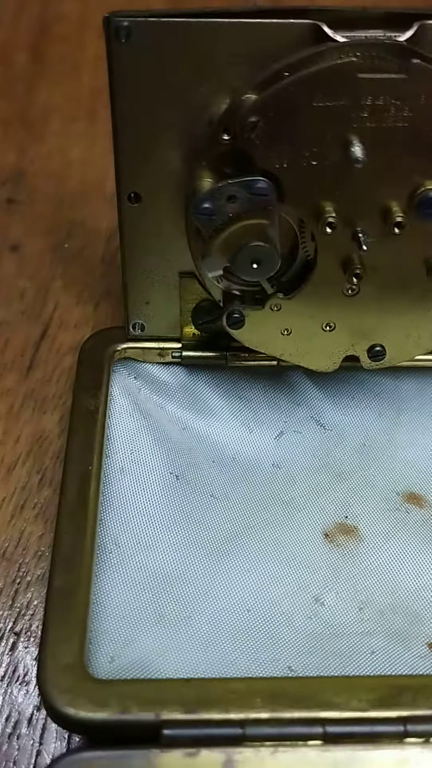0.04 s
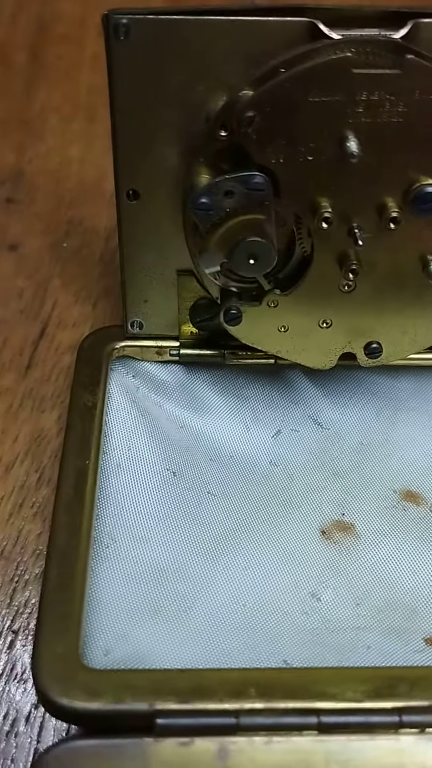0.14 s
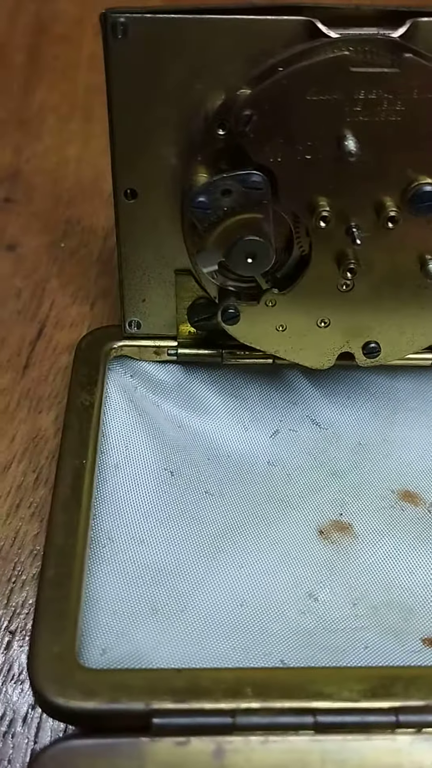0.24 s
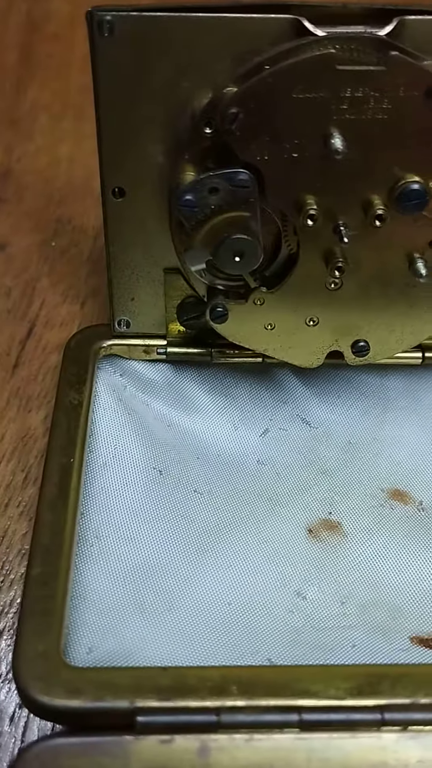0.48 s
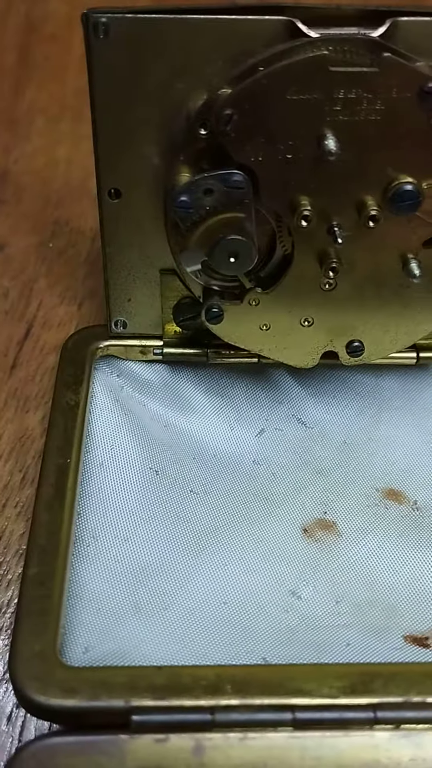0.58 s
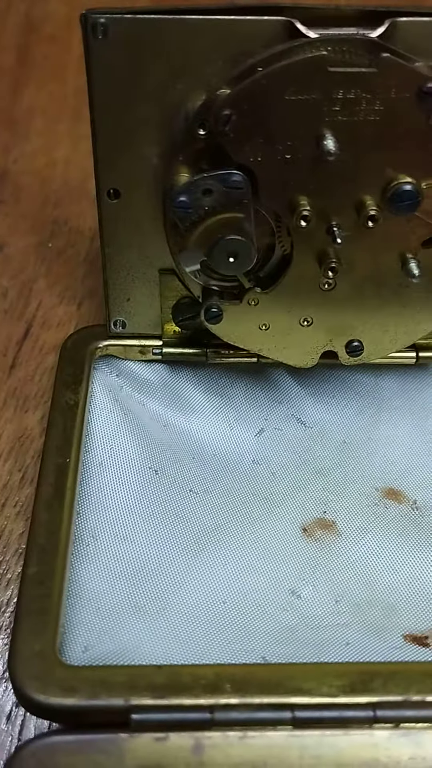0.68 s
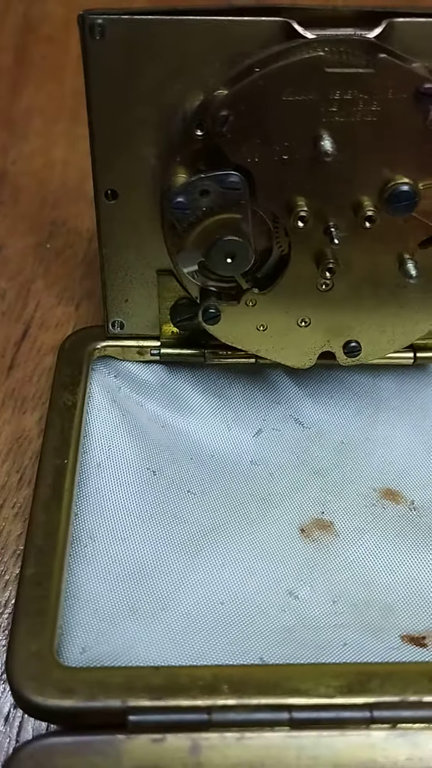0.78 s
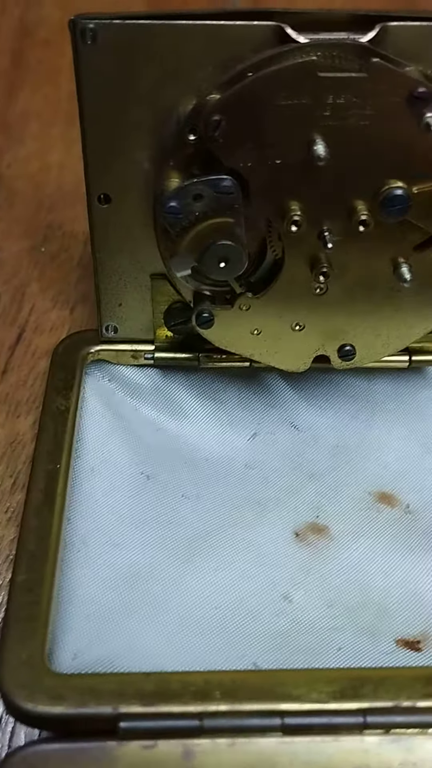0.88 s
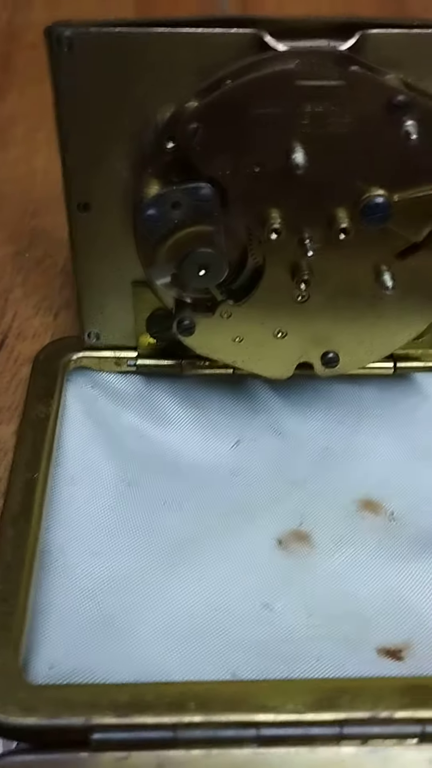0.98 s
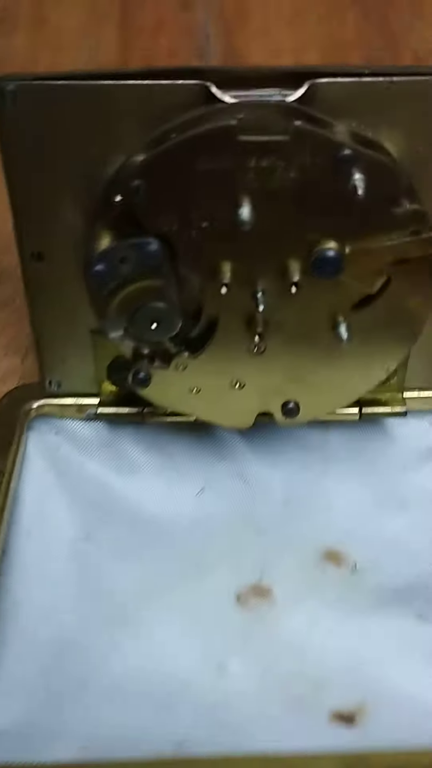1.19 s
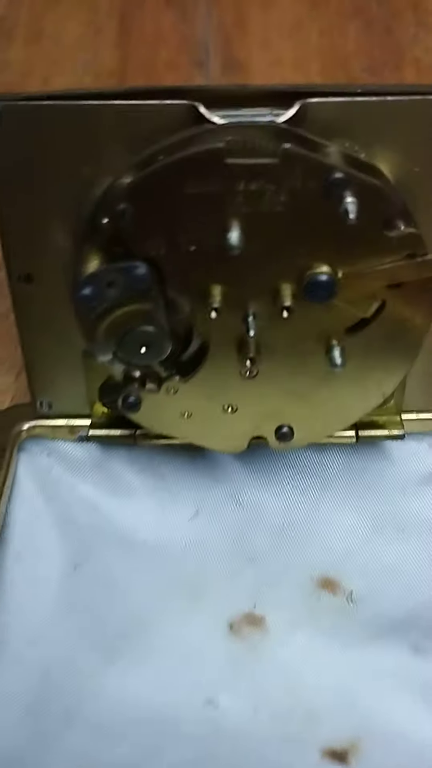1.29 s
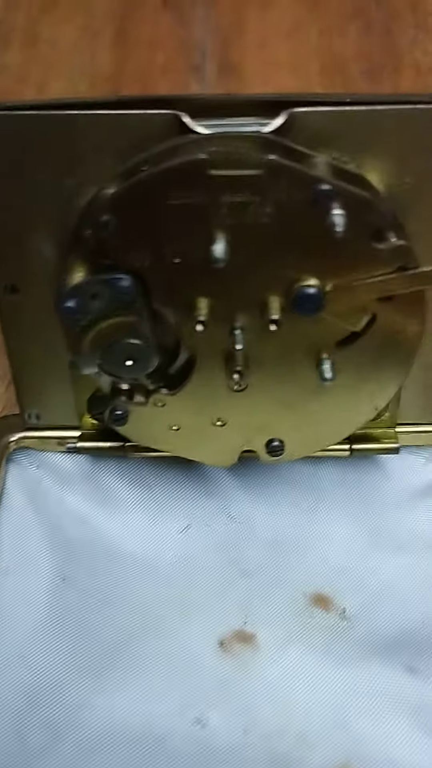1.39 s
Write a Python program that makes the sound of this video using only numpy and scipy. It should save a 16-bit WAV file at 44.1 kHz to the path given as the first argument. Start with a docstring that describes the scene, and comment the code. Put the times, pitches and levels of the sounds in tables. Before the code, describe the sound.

Close up, a small brass clock gives quick, sharp ticks in a room with low rumble and hum. A faint high whistle falls away at the start, and one knock lands on the wooden table as the ticking continues.

```python
"""A room with a wooden table. Close by, a small brass travel clock ticks five times a second:
lever and escape wheel click, the case and hairspring ring faintly. Something knocks once on
the table and chatters to rest, waking the room modes. A thin high whistle falls away in the
room's echo. Underneath: low rumble, two hums, faint hiss."""
import sys
import numpy as np
from scipy import signal
from scipy.fft import rfft, irfft, next_fast_len
from scipy.io import wavfile
from scipy.ndimage import map_coordinates

SR = 44100
rng = np.random.default_rng(int(sys.argv[2]) if len(sys.argv) > 2 else 0)


def wrap_up_sound(samples):
    """Save the sound to the file named by the first command line argument, as 16-bit audio."""
    columns = np.atleast_2d(samples).T
    # keep every value between -1 and 1, then stretch to whole-number steps
    tamed = np.clip(columns, -1, 1)
    steps = np.round(tamed * 32767).astype(np.int16)
    wavfile.write(sys.argv[1], SR, steps)


N = 63945

# escapement beats: t/s, level/dB, left-right/dB, swing (0 tick, 1 tock), case ring/dB
BEATS = [(.1005, -41.5, 1.5, 0, -8), (.3043, -43, 6.5, 1, -6), (.4985, -42.5, -1, 0, -3),
         (.7029, -43, 7, 1, 1), (.8959, -42, 2, 0, 0), (1.1010, -45, 7, 1, 4), (1.2940, -44.5, 1, 0, 7)]
# contacts per swing: t/s from the beat, level/dB
TICK_CONTACTS = [(-.0295, -23.5), (-.012, -12), (0, 0.5)]
TOCK_CONTACTS = [(-.002, -20), (0, 0)]
# click spectra: f/Hz, level/dB
TICK_SPECTRUM = [(1500, -10.5), (4000, -16), (5500, -1), (6600, -18), (7800, 7), (9500, -0.5),
                 (11200, -11.5), (12800, 3.5), (15500, 6)]
TOCK_SPECTRUM = [(1500, -19.5), (4000, -18), (5500, -24.5), (8000, -9), (8800, -17), (9900, -13.5),
                 (11700, -25), (12850, 2), (13600, -3.5), (14500, -0.5), (15800, -3.5)]
# brass case modes: f/Hz, tick level/dB, tock level/dB, t60/s
CASE_MODES = [(1890, -26, -24, .06), (5060, -22, -35, .03), (5950, -27, -36, .02)]

# blow and rebounds: t/s, level/dB, cutoff/Hz
KNOCK_CONTACTS = [(.2233, -9.5, 3610), (.2312, -14.5, 722), (0.2391, -20, 595), (0.2446, -34, 610),
                  (.2542, -21.5, 600)]
# table modes: f/Hz, level/dB, t60/s, rise/s
TABLE_MODES = [(130, -34, 0.013, 0.0011), (249, -3.5, 0.017, 0.003), (367, -0.5, 0.025, 0.00092),
               (476.6, -0.5, 0.021, 0.001), (680, -11.5, 0.037, 0.0015), (897, -23.5, 0.0097, 0.00079),
               (1172, -8.5, 0.013, 0.0019), (1880, -36, 0.074, 0.0011), (2178, -17, 0.021, 0.0025),
               (2443, -14, 0.018, .002)]
# crack spectrum, echo gain: f/Hz, level/dB
CRACK_SPECTRUM = [(2000, -19.5), (3000, -6), (3600, 21), (4500, -28), (7000, -19.5), (9000, -16),
                  (11000, -17), (15000, -13.5)]
KNOCK_ECHO = [(150, -18.5), (400, -15), (900, -13.5), (1500, -21), (2400, -18)]
# room modes: f/Hz, level/dB, t60/s
ROOM_MODES = [(141.6, -26, 0.48), (231.3, -18, 0.47), (385.7, -38.5, 0.674), (458, -30, 1),
              (499, -35.5, 0.59), (715, -33.5, 0.6), (834, -46, 0.29), (1029, -44, 0.33)]
# whistle path: t/s, f/Hz, level/dB, waver/fraction of pitch
WHISTLE_PATH = [(-.06, 5266, -60.5, 0.013), (-.01, 5650, -57, 0.037), (.03, 6440, -60.5, 0.018),
                (0.071, 6500, -70.5, 0.017), (.13, 6100, -80, 0.02), (0.174, 5518, -58, 0.021),
                (0.236, 5100, -57, 0.022), (0.264, 4554, -60.5, 0.016), (0.378, 4520, -63.5, 0.013),
                (0.429, 4555, -77.5, .006), (.6, 4700, -100, 0.0068)]

# background spectra: f/Hz, level/dB
RUMBLE_SPECTRUM = [(15, -5), (29, 2.5), (42, -17), (60, -10), (105, -7), (140, -6.5), (185, -11.5),
                   (240, -7), (320, -22), (480, -21), (760, -31), (1400, -40.5), (1750, -38.5),
                   (1920, -31.5), (2300, -48.5), (4000, -48), (10000, -60.5), (16000, -80.5)]
HISS_SPECTRUM = [(1500, -49), (1850, 2.5), (2400, 3), (2800, -7.5), (4000, -63)]
AIR_SPECTRUM = [(1000, 4), (3000, 2.5), (5200, -1), (7500, -12), (11000, -12), (13500, -5.5), (15500, -9)]
# background envelopes: t/s, level/dB
RUMBLE_LEVELS = [(0, -49), (.4, -48), (.8, -47.5), (1.1, -48.5), (1.44, -48)]
HUM_LEVELS = [(0, -49), (.25, -54.5), (.4, -44.5), (0.549, -49.5), (0.801, -53), (1.44, -53.5)]
DRONE_LEVELS = [(0, -57.5), (.95, -60.5), (1.151, -51.5), (1.35, -47), (1.44, -56.5)]
HISS_LEVELS = [(0, -75), (.25, -79), (.4, -68.5), (.62, -71.5), (.8, -82), (1.44, -83)]
AIR_LEVELS = [(0, -73), (.5, -73), (.75, -76.5), (.88, -70.5), (1.05, -74), (1.22, -67.5), (1.44, -75.5)]
# stereo balance: f/Hz, left-right/dB
KNOCK_BALANCE = [(100, 0), (400, -2), (700, -2.5), (1300, -5.5), (2400, -5.5)]
RUMBLE_BALANCE = [(50, -1.5), (500, 0), (2000, -9), (6000, -13.5), (14000, 10.5)]
# room decay: f/Hz, t60/s
ROOM_DECAY = [(100, 0.71), (250, 1), (500, 0.82), (1000, 1), (2500, 0.13), (6000, .35), (14000, 0.39)]
# diffuse field: f/Hz, left-right correlation
COHERENCE = [(30, 0.8), (200, 0.99), (600, 0.84), (1500, 0.23), (4000, 0), (14000, 0)]

CLICK_RISE_S, CLICK_T60_S = .00015, .008
SPRING_HZ, SPRING_T60_S, SPRING_TICK_DB, SPRING_TOCK_DB = 12985, .75, -44, -36.5
CRACK_DB, CRACK_T60_S = -43, .022
ROOM_MODE_GAIN_DB, ROOM_MODE_RISE_S, ROOM_MODE_DRIFT_RAD = -16, .022, .55
WHISTLE_DIRECT_DB, WHISTLE_ECHO_T60_S = -10, .97
HUM_HZ, DRONE_HZ, BAND_LIMIT_HZ = 82.2, 158.8, 16200


def clock():
    """Each swing: light lever contacts, then the escape wheel drops; case and hairspring ring."""
    out, t = np.zeros((2, N)), np.arange(SR // 2) / SR
    attack = 1 - np.exp(-t / CLICK_RISE_S)
    for beat_s, beat_db, pan_db, tock, ring_db in BEATS:
        contacts, spectrum = (TOCK_CONTACTS, TOCK_SPECTRUM) if tock else (TICK_CONTACTS, TICK_SPECTRUM)
        clicks, metal = np.zeros(N), np.zeros(N)
        case = sum(amp(tock_db if tock else tick_db) * mode(t, hz, t60_s)
                   for hz, tick_db, tock_db, t60_s in CASE_MODES)
        for offset_s, contact_db in contacts:
            strike = amp(beat_db + contact_db) * attack
            click = coloured(rng.standard_normal(len(t)), spectrum) * fade(t, CLICK_T60_S)
            add(clicks, beat_s + offset_s, strike * click)
            add(metal, beat_s + offset_s, strike * amp(ring_db) * case)
        spring_db = beat_db + (SPRING_TOCK_DB if tock else SPRING_TICK_DB)
        add(metal, beat_s, amp(spring_db) * mode(t, SPRING_HZ, SPRING_T60_S))
        direct = pan(pan_db) * (skewed(clicks, left_lead_s=.0003) + metal)
        out += direct + amp(db=-24) * echo(clicks + metal, ROOM_DECAY)
    return out


def knock():
    """A hard blow on wood with a faint crack, then softer, duller rebounds; the room rings on."""
    wood, t = np.zeros(N), np.arange(SR) / SR
    blow_s = KNOCK_CONTACTS[0][0]
    ring = -sum(amp(db) * mode(t, hz, t60_s) * (1 - np.exp(-(t / rise_s) ** 2))
                for hz, db, t60_s, rise_s in TABLE_MODES)
    for contact_s, db, cutoff_hz in KNOCK_CONTACTS:
        lowpass = signal.butter(2, cutoff_hz, fs=SR, output="sos")
        add(wood, contact_s, amp(db) * signal.sosfilt(lowpass, ring))
    crack = coloured(rng.standard_normal(len(t)), CRACK_SPECTRUM) * fade(t, CRACK_T60_S)
    add(wood, blow_s, amp(CRACK_DB) * crack)
    tail = filtered(echo(wood, ROOM_DECAY), lambda hz: amp(along(KNOCK_ECHO, hz)))
    out = skewed(wood, left_lead_s=-.00012) + tail
    build_up = 1 - np.exp(-t / ROOM_MODE_RISE_S)
    for hz, db, t60_s in ROOM_MODES:
        drift_rad = ROOM_MODE_DRIFT_RAD * wobble(rate_hz=30, size=len(t))
        add(out, blow_s, amp(ROOM_MODE_GAIN_DB + db) * mode(t, hz, t60_s, drift_rad) * build_up)
    return filtered(out, lambda hz: pan(along(KNOCK_BALANCE, hz)))


def whistle():
    """A distant wavering whistle that lifts, falls and steadies; mostly echo."""
    preroll = SR // 10
    t = np.arange(-preroll, N) / SR
    times_s, *columns = np.transpose(WHISTLE_PATH)
    pitch_hz, db, waver = (np.interp(t, times_s, column) for column in columns)
    tone = amp(db) * wavering_tone(pitch_hz, waver, rate_hz=700, size=len(t))
    out = amp(WHISTLE_DIRECT_DB) * tone + echo(tone, [(5000, WHISTLE_ECHO_T60_S)])
    return pan(db=-6.5) * out[:, preroll:]


def hum(pitch_hz, levels):
    """A low, slowly wavering tone."""
    return envelope(levels) * wavering_tone(pitch_hz, waver=.015, rate_hz=15, size=N)


def background():
    """Room rumble, two hums, airy treble and a faint hiss that swells after the knock."""
    rumble = unit(filtered(diffuse_noise(),
                           lambda hz: amp(along(RUMBLE_SPECTRUM, hz)) * pan(along(RUMBLE_BALANCE, hz))))
    hums = pan(db=-1.5) * hum(HUM_HZ, HUM_LEVELS) + hum(DRONE_HZ, DRONE_LEVELS)
    low = envelope(RUMBLE_LEVELS) * rumble + hums
    hiss = envelope(HISS_LEVELS) * coloured(diffuse_noise(), HISS_SPECTRUM)
    air = envelope(AIR_LEVELS) * coloured(diffuse_noise(), AIR_SPECTRUM)
    return skewed(low, left_lead_s=.00027) + hiss + air


def echo(x, decay):
    """Diffuse stereo echo; decay sets t60 per frequency."""
    hz, t, spectra = signal.stft(diffuse_noise(), SR, nperseg=256)
    t60_s = along(decay, hz)[:, None]
    energy_norm = np.sqrt(2 * np.log(1000) / (t60_s * SR))
    impulse = signal.istft(spectra * fade(t, t60_s) * energy_norm, SR, nperseg=256)[1]
    return signal.fftconvolve(x[None], impulse, axes=1)[:, :len(x)]


def diffuse_noise():
    """Stereo white noise, correlated in the bass only."""
    def mid_side_gains(hz):
        angle_rad = np.arccos(np.clip(along(COHERENCE, hz), -1, 1)) / 2
        return np.array([np.cos(angle_rad), np.sin(angle_rad)])
    mid, side = filtered(rng.standard_normal((2, N)), mid_side_gains)
    return np.array([mid + side, mid - side])


def mode(t, hz, t60_s, phase_rad=0):
    return np.sin(2 * np.pi * hz * t + phase_rad) * fade(t, t60_s)


def wavering_tone(pitch_hz, waver, rate_hz, size):
    hz = pitch_hz * (1 + waver * wobble(rate_hz, size))
    return np.sqrt(2) * np.sin(2 * np.pi * np.cumsum(hz) / SR)


def wobble(rate_hz, size):
    """Smooth random curve."""
    knots = rng.standard_normal(size // 10)
    return map_coordinates(knots, [np.arange(size) * rate_hz / SR], mode="wrap")


def amp(db):
    return 10 ** (np.asarray(db) / 20)


def unit(x):
    return x / np.sqrt(np.mean(x ** 2) + 1e-20)


def fade(t, t60_s):
    return np.exp(-np.log(1000) * t / t60_s)


def along(points, hz):
    """Interpolate over log frequency."""
    knots_hz, values = np.transpose(points)
    return np.interp(np.log(hz + 1), np.log(knots_hz + 1), values)


def envelope(levels):
    return amp(np.interp(np.arange(N) / SR, *np.transpose(levels)))


def pan(db):
    """Channel gains, left over right by db."""
    return amp(np.array([[.5], [-.5]]) * db)


def skewed(x, left_lead_s):
    """Sound reaches one side first."""
    return filtered(x, lambda hz: np.exp(np.pi * 1j * hz * left_lead_s * np.array([[1], [-1]])))


def coloured(noise, spectrum):
    return unit(filtered(noise, lambda hz: amp(along(spectrum, hz))))


def filtered(x, response):
    n = x.shape[-1]
    padded = next_fast_len(n + 8192)
    return irfft(rfft(x, padded) * response(np.fft.rfftfreq(padded, 1 / SR)), padded)[..., :n]


def add(track, start_s, sound):
    part = track[..., max(round(start_s * SR), 0):][..., :sound.shape[-1]]
    part += sound[..., :part.shape[-1]]


def scene():
    """Clock, knock and whistle in the room."""
    return clock() + knock() + whistle() + background()


def record(dry):
    """Brick-wall low-pass."""
    return filtered(dry, lambda hz: hz < BAND_LIMIT_HZ)


dry = scene()
out = record(dry)
wrap_up_sound(out)
```